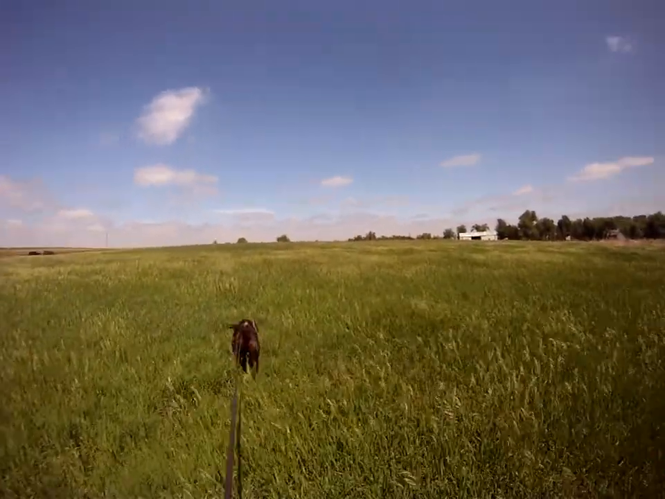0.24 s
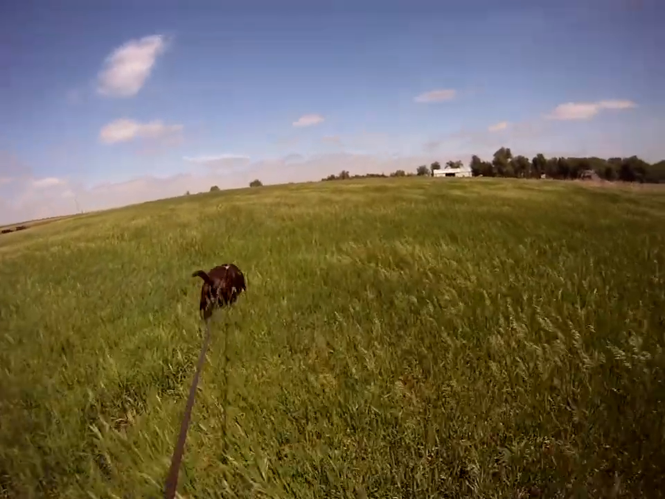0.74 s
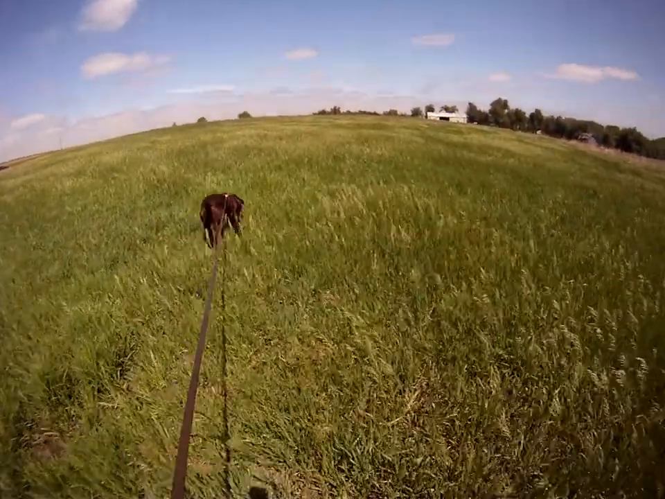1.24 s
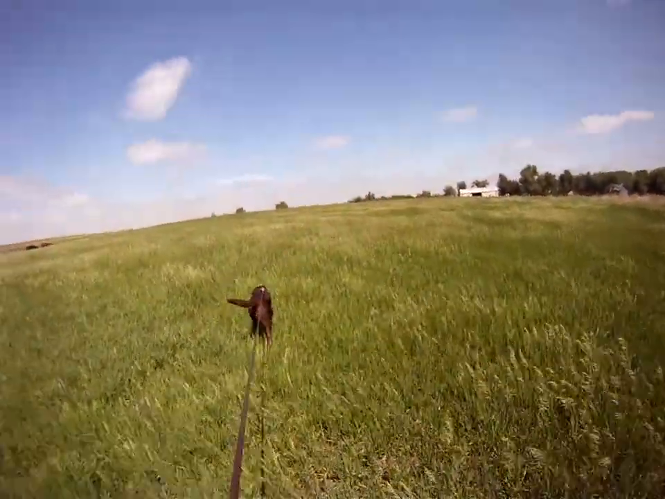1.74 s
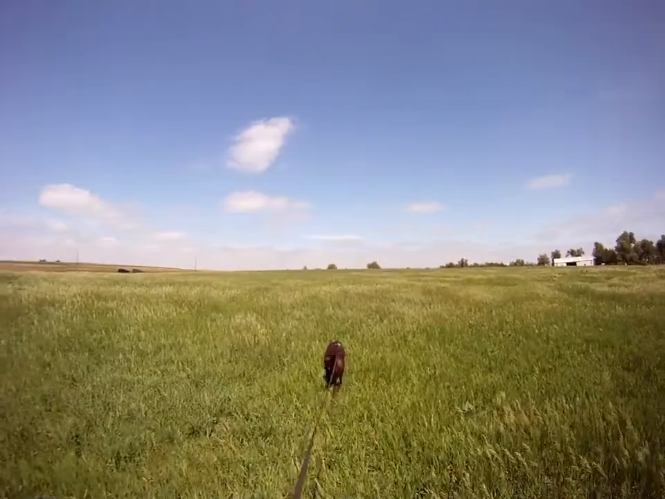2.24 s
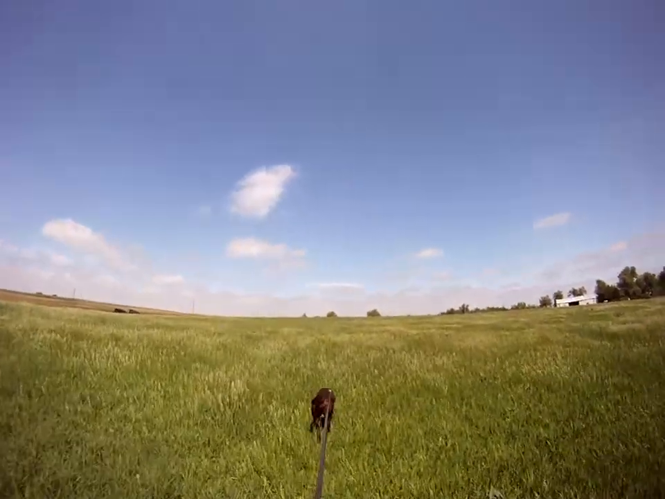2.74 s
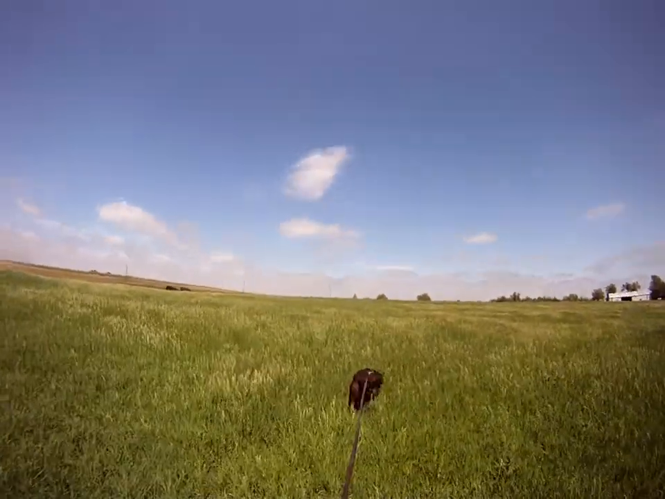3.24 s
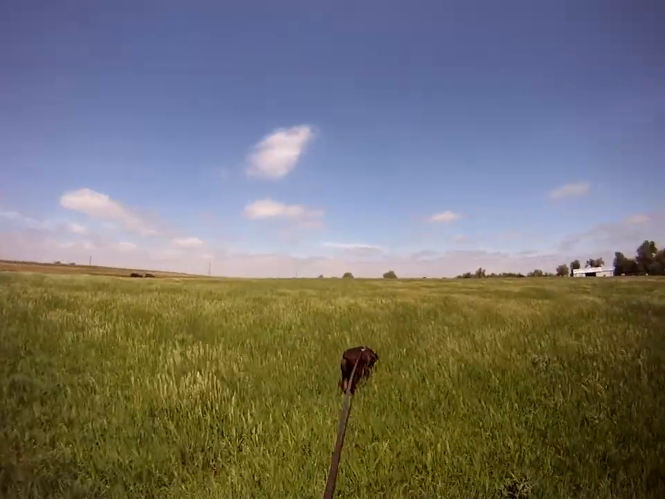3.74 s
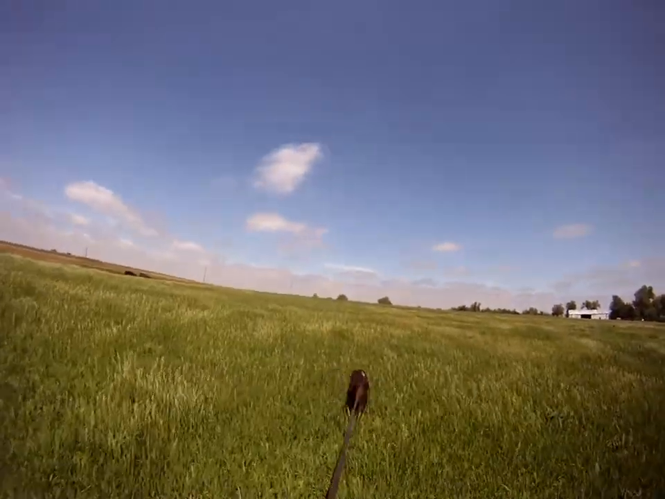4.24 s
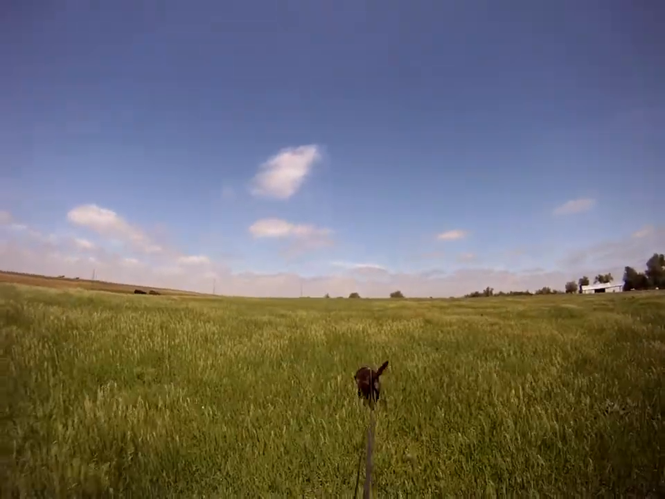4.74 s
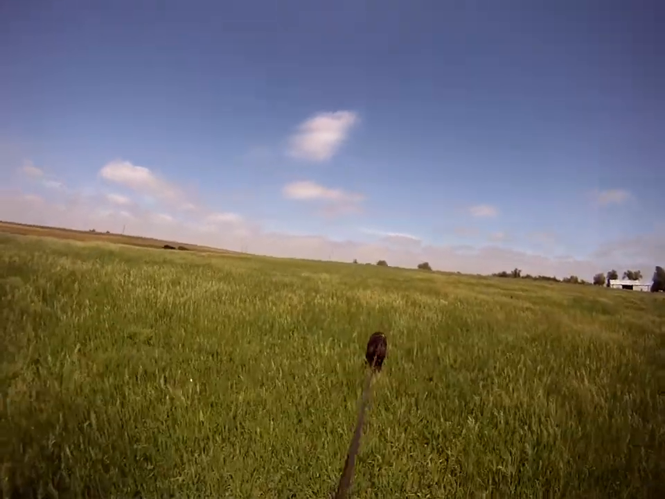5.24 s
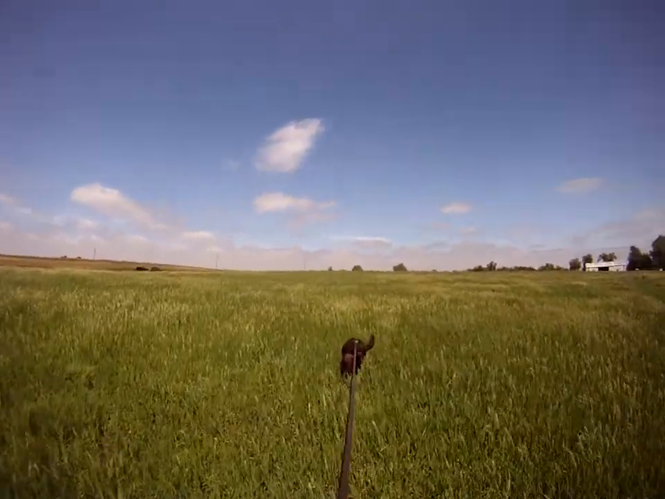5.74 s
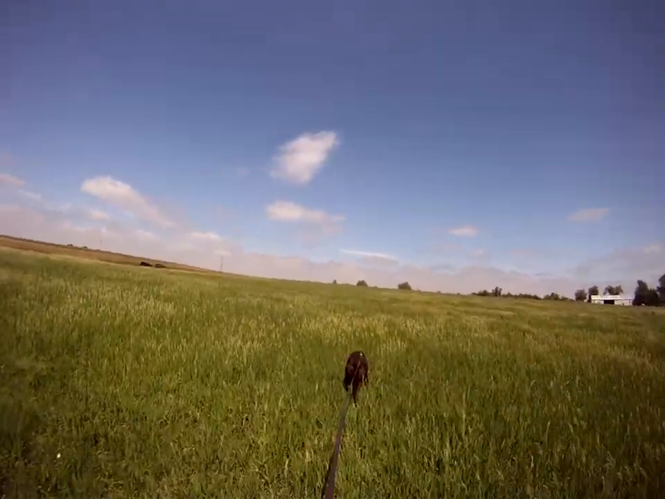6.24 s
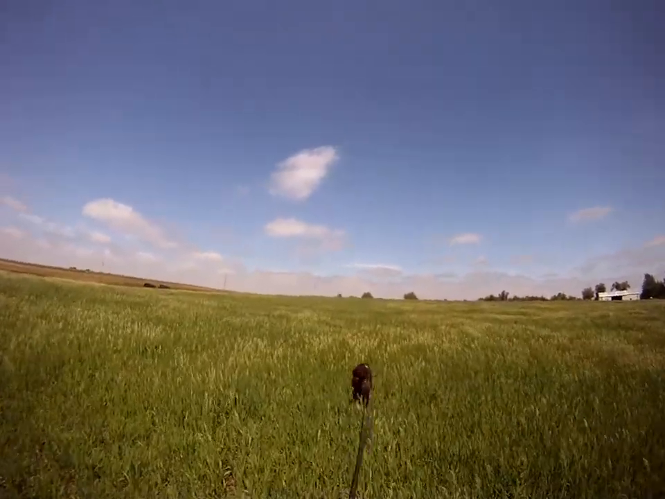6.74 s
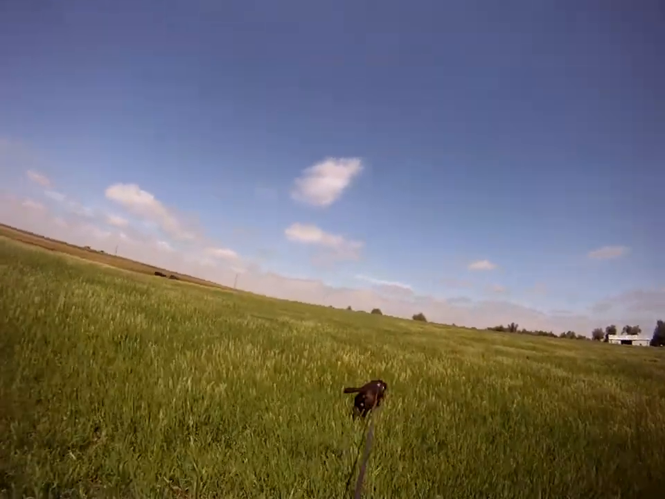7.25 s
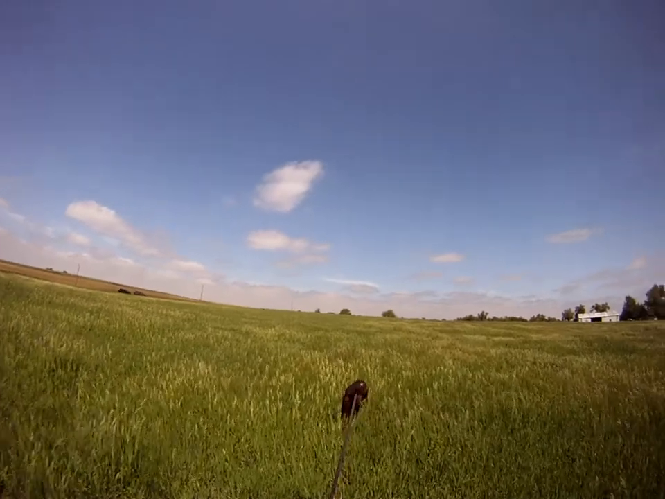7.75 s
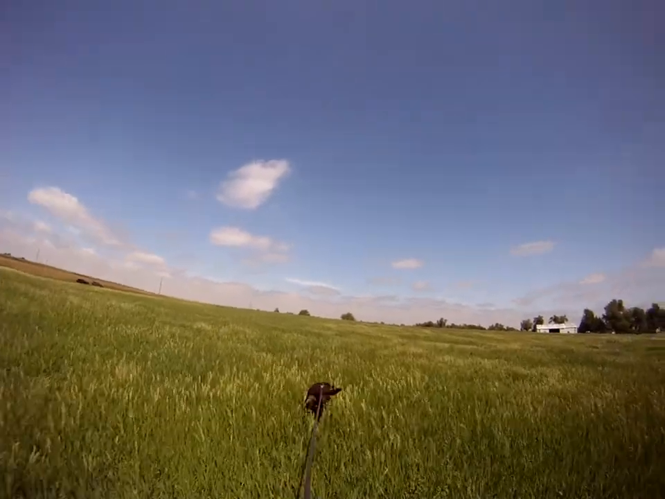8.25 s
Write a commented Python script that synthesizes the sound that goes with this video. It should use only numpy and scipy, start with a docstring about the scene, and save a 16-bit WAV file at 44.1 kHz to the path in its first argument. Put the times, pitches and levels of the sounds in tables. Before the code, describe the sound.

An open grassy field, heard through a cheap camera strapped to a walker. From 0.3 to 8.4 seconds, steps fall about every half second: deep, dull, swaying thumps, heel followed at once by a softer forefoot, with a faint coarse crunch of stalks. The step near 4.5 is much weaker. Very close, the plastic mount creaks in short irregular runs of dry ticks, sharper around 2.0, 2.7, 5.0 and 5.5, with stray faint clicks between. Quiet grainy grass rustle swells with the strides, and soft swishes brush past near 1.5, 4.9, 6.9 and 8.4. Low lumpy wind gusts during the first second or so, then eases. A tiny distant bird whistle rises slightly and falls at 3.6-3.9. A soft hollow tap rings the case at 5.6, a harder one at 6.1. Steady hiss continues, with no echo and a brittle, glassy top.

```python
"""An open field of tall grass: someone walks through it with a small camera strapped to the body.
Each step is a dull swaying thump with a crunch of stalks; the camera's plastic mount creaks in runs of ticks.
Two taps ring the case. Grainy noise, coloured by the hollow case, makes the rustle and swish of the grass.
A light wind of lumpy noise, one far whistling bird and a steady hiss lie behind.
Coarse held sampling mirrors the sound upward into a glassy top."""
import sys
import numpy as np
from scipy import signal
from scipy.fft import rfft, irfft, next_fast_len
from scipy.io import wavfile
from scipy.ndimage import map_coordinates

SR = 44100
rng = np.random.default_rng(int(sys.argv[2]) if len(sys.argv) > 2 else 0)


def generate_wav(sig):
    """Save sig (samples, or channels by samples) to the path in sys.argv[1] as 16-bit PCM at SR."""
    pcm = np.round(np.clip(np.atleast_2d(sig).T, -1, 1) * 32767).astype(np.int16)
    wavfile.write(sys.argv[1], SR, pcm)


N = 373963
TIME = np.arange(N) / SR

# Steps, about two a second. Each row: heel crest in seconds, heel level in dB, forefoot level in dB,
# sway pitch in Hz.
FOOTSTEPS = [(0.307, -23, -27, 28.7), (.859, -21.5, -31, 32.3), (1.388, -21.5, -30.5, 33.1),
             (1.926, -19.5, -31, 28.97), (2.497, -22, -22.5, 34.4), (2.979, -26.5, -24.5, 33.04),
             (3.452, -20, -30, 26.2), (3.943, -24.5, -32.5, 30.6), (4.453, -35.5, -34, 26),
             (4.952, -18.5, -38, 28.62), (5.459, -23, -31.5, 26.85), (5.935, -24.5, -30.5, 29.7),
             (6.412, -22, -36.5, 28.7), (6.915, -27.5, -31, 28.02), (7.476, -27, -45, 33.1),
             (7.938, -26, -24.5, 27.7), (8.42, -19.5, -36, 28.73)]
# Creaks of the mount. Each row: first slip in seconds, its level in dB before the mount's gain and scatter,
# length in seconds.
MOUNT_CREAKS = [(0.1014, -37.5, 0.032), (0.1417, -39.5, .01), (0.392, -32, .02), (0.4286, -46, 0.015),
                (.8598, -43, .014), (0.9066, -38, 0.0077), (0.9436, -37, 0.015), (1.1717, -40, 0.012),
                (1.2384, -50, .008), (1.35, -44, .012), (1.402, -47.5, 0.00824), (1.464, -40.5, .022),
                (1.5224, -40, 0.0054), (1.761, -40.5, 0.054), (1.8655, -43, .018), (1.997, -36.5, 0.0074),
                (2.0137, -30.5, 0.019), (2.289, -36, 0.034), (2.4412, -39, 0.012), (2.5195, -38.5, .005),
                (2.5755, -43.5, .008), (2.68, -30.5, 0.033), (2.917, -48.5, 0.0042), (2.9578, -39.5, 0.012),
                (3.2309, -47.5, .005), (3.425, -37, 0.014), (3.462, -35.5, .013), (3.5898, -42, 0.0084),
                (3.7982, -32.5, 0.0251), (4.2198, -42.5, 0.038), (4.645, -41, 0.015), (4.9973, -29, 0.02),
                (5.09, -48, .005), (5.2867, -36, 0.0302), (5.4422, -37.5, .005), (5.494, -28, 0.025),
                (5.5889, -43, 0.0045), (5.696, -40, .045), (5.9428, -39.5, 0.025), (6.195, -47, .01),
                (6.3675, -39, 0.018), (6.4335, -31, 0.022), (6.629, -40, .005), (6.647, -40.5, 0.015),
                (7.0455, -52.5, 0.0078), (7.153, -42.5, 0.017), (8.0423, -42, .008), (8.102, -47.5, .008),
                (8.176, -44.5, .008), (8.417, -41, .008)]
# Plastic modes of the mount. Each row: pitch in Hz, relative level in dB, 60 dB decay of one pass in seconds.
MOUNT_MODES = [(1627, -16, 0.0061), (2210, -8.5, 0.0027), (3695, -1.5, 0.0017), (4640, -8, 0.0037),
               (3573, -14.5, 0.01), (5580, -8.5, 0.00074), (3790, -12.5, 0.008)]
# Notes rung by two taps on the case. Each row: start in seconds, level in dB before the bass cut,
# pitch in Hz, 60 dB decay of one pass in seconds.
CASE_TAP_NOTES = [(5.6381, -32, 1007, .012), (6.0975, -33, 1223, 0.0044), (6.0975, -31, 1670, 0.0081),
                  (6.0975, -35, 2260, 0.0088)]
# Rustle of the stalks between steps. Each row: time in seconds, level in dB before strides and patchiness.
RUSTLE_LEVEL = [(0, -62.5), (1.28, -61.5), (1.52, -56), (2.1, -62.5), (3, -60.5), (4.5, -64), (5.3, -62.5),
                (6.5, -61), (7.3, -63.5), (7.75, -60), (8.48, -64.5)]
# A leg sweeping through a thicker tuft. Each row: peak in seconds, level in dB, swell width in seconds.
TUFT_SWEEPS = [(.29, -62, .12), (1.37, -59, .015), (1.51, -55.5, 0.025), (1.75, -61.5, .11),
               (3.24, -60, .034), (3.42, -62, 0.037), (4.63, -58, 0.056), (4.891, -52.5, 0.056),
               (6.85, -53.5, .046), (8.39, -54, 0.13)]
# Spectrum of rustle and crunch. Each row: frequency in Hz, relative density in dB per Hz.
RUSTLE_SPECTRUM = [(300, -24), (700, -13), (1000, -13), (1500, -11.5), (2200, -8), (2800, -11), (3700, -18),
                   (5500, -13)]
# Spectrum of the sweeps. Each row: frequency in Hz, relative density in dB per Hz.
SWEEP_SPECTRUM = [(300, -20), (700, -13), (1000, -5), (1500, -8.5), (2100, -2.5), (2800, -7.5),
                  (3700, -17.5), (5500, -16)]
# Air resonances of the hollow case. Each row: centre in Hz, width in Hz, level in dB against the direct sound.
CASE_RESONANCES = [(972, 223, 5.5), (1120, 122, 3.5), (1959.7, 220, 1), (2110, 240, 0.5), (3666, 214, 8)]
# The bird's whistle. Each row: time in seconds, pitch in Hz, level in dB before the waver.
BIRD_WHISTLE = [(3.62, 2774, -75), (3.67, 2860, -69), (3.739, 2780, -70), (3.801, 2390, -60),
                (3.86, 2347, -68), (3.909, 2330, -80)]
# Wind on the case, gusty and then easing. Each row: time in seconds, level in dB before the wind's gain.
WIND_LEVEL = [(0, -56.5), (.25, -53), (.7, -57.5), (1.1, -53), (1.35, -58.5), (2.6, -59), (3.6, -61),
              (6, -61), (8.48, -61.5)]
# Spectrum of the wind. Each row: frequency in Hz, relative density in dB per Hz.
WIND_SPECTRUM = [(20, 10.5), (35, 1.5), (60, -9), (100, -14), (150, -19), (250, -22.5), (450, -30.5),
                 (1200, -44)]
# Spectrum of the microphone noise. Each row: frequency in Hz, relative density in dB per Hz.
HISS_SPECTRUM = [(100, -10), (500, 0.5), (1500, -6.5), (3000, -8.5), (5500, -14.5)]

ROLL_S = 0.065  # from heel to forefoot
STRIDE_S = 0.13  # half width of the swell around each heel
STRIDE_DB = 1.5  # lift of the rustle there
FIRST_GAP_S, LAST_GAP_S, HASTEN = 0.0085, 0.004, 0.6  # gaps between slips shrink from first towards last
CREAK_FADE_DB = -14  # from the first slip to the end of the creak
CAMERA_RATE = 12000  # samples per second
CUTOFF_HZ = 15250


def footfalls(rise_s=0.027, settle_s=0.025, crest_db=-17, thud_db=-27.5, thud_s=0.025, thud_hz=85):
    """The body softens each landing into a slow sway with a sharper crest; the soil adds a brief rough thud."""
    out = np.zeros(N)
    soil_band = [thud_hz / 1.56, thud_hz * 1.09]
    soil_filter = signal.butter(2, soil_band, "band", fs=SR, output="sos")
    soil = rms_one(signal.sosfilt(soil_filter, rng.standard_normal(N)))
    for s, db, hz in landings():
        near = np.abs(TIME - s) < 0.25
        t = TIME[near] - s
        rise = np.exp(-(t / rise_s) ** 2)
        settle = 1 / np.cosh(2 * t / settle_s) ** 0.5
        swell = np.where(t < 0, rise, settle)
        phase = 2 * np.pi * hz * t
        # the octave sharpens the crest
        crest = from_db(crest_db) * swell ** 2 * np.cos(2 * phase)
        sway = swell * np.cos(phase) + crest
        thud = from_db(thud_db) * np.exp(-(t / thud_s) ** 2) * soil[near]
        out[near] += from_db(db) * (sway + thud)
    return out


def crunch(gain_db=-42, press_s=0.052):
    """Stalks snap coarsely under the shoe, louder the harder it lands."""
    weight = sum(from_db(db) * np.exp(-((TIME - s) / press_s) ** 2) for s, db, hz in landings())
    return from_db(gain_db) * weight * blades(RUSTLE_SPECTRUM, per_s=730, grain_db=4.5)


def landings():
    """Each step comes down twice, heel and then forefoot: rows of seconds, dB, sway Hz."""
    rows = []
    for s, heel_db, forefoot_db, hz in FOOTSTEPS:
        rows += [(s, heel_db, hz), (s + ROLL_S, forefoot_db, hz)]
    return rows


def strides():
    """A bump of height 1 around each heel, sinking between steps."""
    return sum(np.exp(-((TIME - step[0]) / STRIDE_S) ** 2) for step in FOOTSTEPS)


def grass(sweep_db=0.0, patchy_db=3.0, stop=0.75):
    """Blades give a grainy rustle lifted by each stride, and a smoother swish that dies faster than it swells."""
    movement_db = STRIDE_DB * strides() + patchy_db * flutter(35)
    rustle = blades(RUSTLE_SPECTRUM, per_s=2500, grain_db=-0.5) * level(RUSTLE_LEVEL) * from_db(movement_db)
    swing = np.zeros(N)
    for s, db, swell in TUFT_SWEEPS:
        width = np.where(TIME < s, swell, stop * swell)
        swing += from_db(db) * np.exp(-0.5 * ((TIME - s) / width) ** 2)
    swish = blades(SWEEP_SPECTRUM, per_s=9000, grain_db=4.0) * swing * from_db(sweep_db)
    return rustle + swish


def blades(spectrum, per_s, grain_db):
    """Random touches of blades on the legs, coloured by the air resonances of the case; unit power."""
    touches = rng.random(N) < per_s / SR
    sizes_db = grain_db * np.minimum(rng.exponential(1, N), 4)
    sizes = from_db(sizes_db) * rng.choice([-1, 1], N)
    scrape = coloured(touches * sizes, spectrum)
    hollow = sum(from_db(db) * resonance(scrape, hz, width) for hz, width, db in CASE_RESONANCES)
    return rms_one(scrape + hollow)


def mount_creaks(gain_db=-4.5, stutter_s=0.0012, low_hz=1000):
    """The mount slips in short runs; all ticks ring the same plastic modes."""
    times, db = slips()
    out = np.zeros(N)
    for k, (hz, mode_db, t60) in enumerate(MOUNT_MODES):
        clicks = np.zeros(N)
        # a slip stutters for about a millisecond, catching roughly in step with each mode
        for part in (-0.5, 0, 0.5):
            cycles = np.round(part * stutter_s * hz) + rng.normal(0, 0.16, times.shape)
            at = np.round((times + cycles / hz) * SR).astype(int)
            click_db = db + mode_db + rng.normal(0, 2.25, times.shape)
            clicks += np.bincount(at, from_db(click_db), N)[:N]
        out += (-1) ** k * swelling_ring(clicks, hz, t60)
    # the small part radiates little bass
    return from_db(gain_db) * signal.sosfilt(signal.butter(2, low_hz, "high", fs=SR, output="sos"), out)


def slips(scatter_db=2.5, jitter=0.18, catch_s=0.0037, catch_db=-19,
          chatter_s=0.0052, chatter_db=-14.0, chatter_scatter_db=4.0, count=14):
    """A creak catches faintly, breaks loose, then slips faster and weaker, trailing chatter: times, dB."""
    s, db, length = np.transpose(MOUNT_CREAKS)[:, :, None]
    gaps = LAST_GAP_S + (FIRST_GAP_S - LAST_GAP_S) * HASTEN ** np.arange(count)
    uneven_gaps = gaps * (1 + jitter * rng.standard_normal((len(s), count)))
    age = np.cumsum(uneven_gaps, axis=1)
    fading_db = db + CREAK_FADE_DB * age / length + rng.normal(0, scatter_db, age.shape)
    times = np.hstack([s - catch_s, s, s + age])
    levels = np.hstack([db + catch_db, db, fading_db])
    sounding = times < s + length
    # three finer ticks after every slip
    chatter = times + chatter_s * rng.uniform(0.25, 1, (3, *times.shape))
    chatter_levels = levels + chatter_db + chatter_scatter_db * rng.standard_normal(chatter.shape)
    all_times = np.append(times[sounding], chatter[:, sounding])
    all_levels = np.append(levels[sounding], chatter_levels[:, sounding])
    return all_times, all_levels


def stray_ticks(per_s=7, loaded_per_s=22, level_db=-55, scatter_db=3.0):
    """The mount also gives single faint ticks at random, more often while a step loads it."""
    ticking = rng.random(N) < (per_s + loaded_per_s * strides()) / SR
    clicks = ticking * from_db(level_db + scatter_db * rng.standard_normal(N))
    return sum(from_db(db) * swelling_ring(clicks, hz, t60) for hz, db, t60 in MOUNT_MODES)


def case_taps(crack_db=-12, low_hz=600):
    """A soft tap rings one hollow note of the case, a hard one three at once; each also jars the mount."""
    out = np.zeros(N)
    for k, (s, db, hz, t60) in enumerate(CASE_TAP_NOTES):
        click = np.zeros(N)
        click[round(s * SR)] = from_db(db)
        crack = sum(from_db(mode_db) * swelling_ring(click, mode_hz, mode_t60)
                    for mode_hz, mode_db, mode_t60 in MOUNT_MODES)
        # the higher the note, the harder the contact
        hardness = (hz / CASE_TAP_NOTES[-1][2]) ** 2
        out += (-1) ** k * swelling_ring(click, hz, t60) + from_db(crack_db) * hardness * crack
    return signal.sosfilt(signal.butter(2, low_hz, "high", fs=SR, output="sos"), out)


def bird(waver_db=3):
    """One pure whistle, rising a touch and then falling, its level wavering on the way across the field."""
    s, hz, db = np.transpose(BIRD_WHISTLE)
    gain = np.interp(TIME, s, from_db(db), left=0, right=0) * from_db(waver_db * flutter(40))
    phase = 2 * np.pi * np.cumsum(np.interp(TIME, s, hz)) / SR
    return gain * np.sin(phase)


def wind(gain_db=12, lumpy_db=3.5, split_hz=130, large_db=-1, small_lumpy_db=2.0):
    """Air rolls over the case; large and small eddies, low and high bands, come and go on their own."""
    air = coloured(rng.standard_normal(N), WIND_SPECTRUM)
    low = signal.sosfiltfilt(signal.butter(2, split_hz, fs=SR, output="sos"), air)
    large_eddies = low * from_db(large_db + lumpy_db * flutter(14))
    small_eddies = (air - low) * from_db(small_lumpy_db * flutter(24))
    return (large_eddies + small_eddies) * level(WIND_LEVEL) * from_db(gain_db)


def hiss(level_db=-65):
    """The microphone's own steady noise."""
    return from_db(level_db) * coloured(rng.standard_normal(N), HISS_SPECTRUM)


def swelling_ring(clicks, hz, t60):
    """Passed through one mode twice, a unit click swells to about height 1 and then dies quickly."""
    decay_samples = t60 * SR / np.log(1000)
    return ring(ring(clicks, hz, t60), hz, t60) * 2 * np.e / decay_samples


def ring(clicks, hz, t60):
    """A unit click sets a decaying sine of about height 1 ringing."""
    r = from_db(-60 / (t60 * SR))
    w = 2 * np.pi * hz / SR
    return signal.lfilter([0, np.sin(w)], [1, -2 * r * np.cos(w), r * r], clicks + 1e-18)


def resonance(x, hz, width):
    """A two-pole band-pass with a gain of about 1 at its peak."""
    r = np.exp(-np.pi * width / SR)
    w = 2 * np.pi * hz / SR
    zeros = np.array([1, 0, -1]) * (1 - r * r) / 2
    return signal.lfilter(zeros, [1, -2 * r * np.cos(w), r * r], x + 1e-18)


def coloured(x, spectrum):
    """Shape a steady sound with a spectrum, thinned below 20 Hz; unit power."""
    hz, db = np.transpose(spectrum)
    size = next_fast_len(N)
    bins = np.fft.rfftfreq(size, 1 / SR) + 1  # 1 Hz up, to keep the logarithm finite
    gain = from_db(np.interp(np.log(bins), np.log(hz), db))
    gain = gain / (1 + (20 / bins) ** 4)
    return rms_one(irfft(rfft(x, size) * gain, size)[:N])


def flutter(per_s):
    """Random wandering between knots at the given rate, with an rms of 1."""
    knots = rng.standard_normal(4000)
    return rms_one(map_coordinates(knots, [TIME * per_s], order=1, mode="wrap"))


def level(curve):
    """Gain at every sample from rows of seconds and dB."""
    return from_db(np.interp(TIME, *np.transpose(curve)))


def rms_one(x):
    """Scale to unit power."""
    return x / np.sqrt(np.mean(x ** 2) + 1e-20)


def from_db(db):
    """Decibels to gain."""
    return 10 ** (np.asarray(db) / 20)


def scene():
    """Open field: everything reaches the microphone without echo."""
    steps = footfalls() + crunch()
    camera = mount_creaks() + stray_ticks() + case_taps()
    background = bird() + wind() + hiss()
    return (steps + grass() + camera + background)[None]


def record(dry):
    """The camera samples slowly and holds each value, which mirrors the sound around 6 and 12 kHz."""
    band = signal.sosfilt(signal.butter(10, 5750, fs=SR, output="sos"), dry)
    samples = signal.resample_poly(band, CAMERA_RATE, SR, axis=-1)
    steps = np.repeat(samples, 4, axis=-1)
    held = signal.resample_poly(steps, SR, 4 * CAMERA_RATE, axis=-1)[:, :N]
    return signal.sosfilt(signal.ellip(10, 0.3, 80, CUTOFF_HZ, fs=SR, output="sos"), held)


dry = scene()
out = record(dry)
generate_wav(out)
```